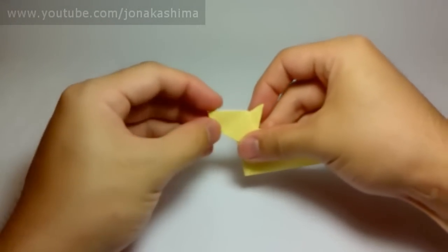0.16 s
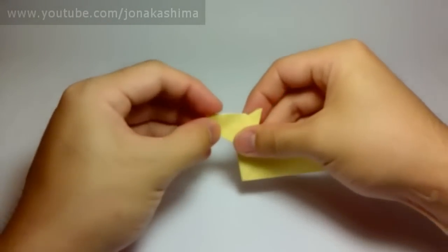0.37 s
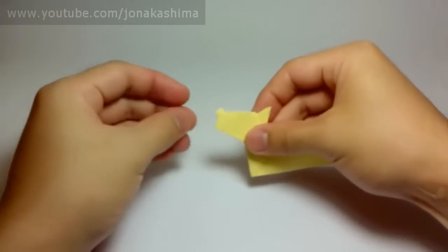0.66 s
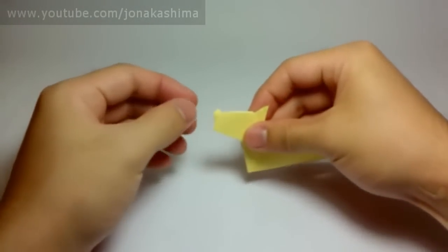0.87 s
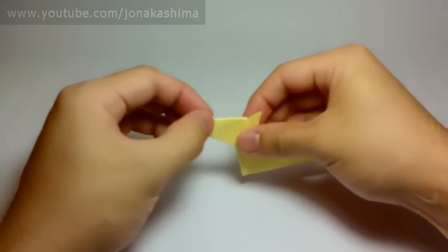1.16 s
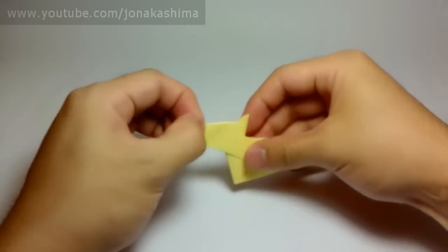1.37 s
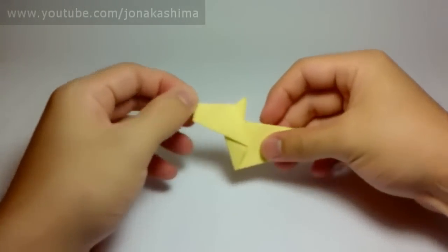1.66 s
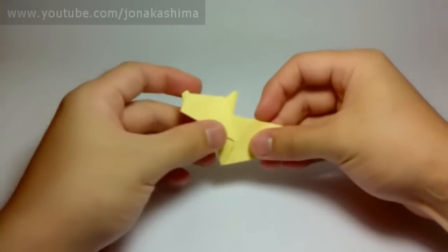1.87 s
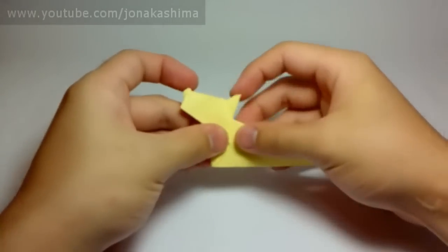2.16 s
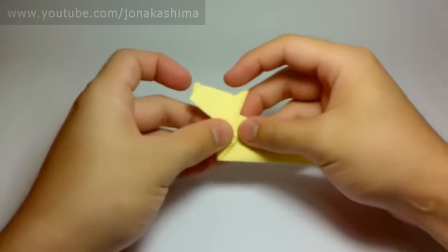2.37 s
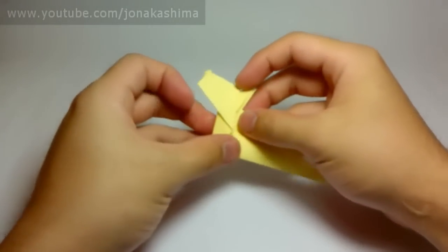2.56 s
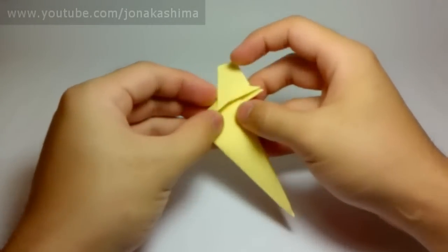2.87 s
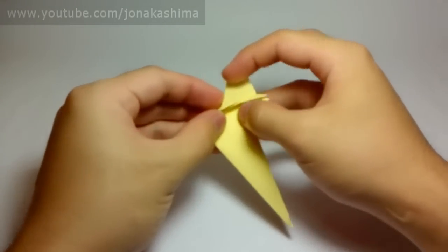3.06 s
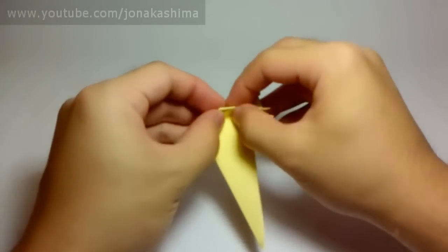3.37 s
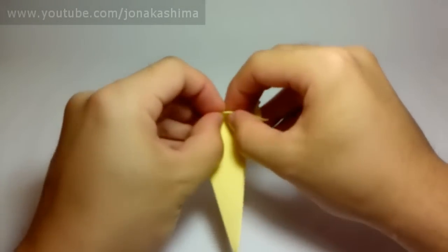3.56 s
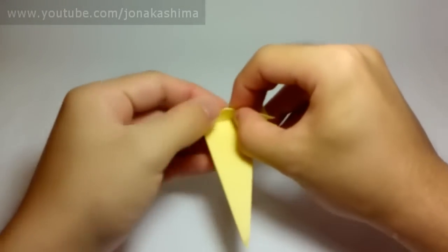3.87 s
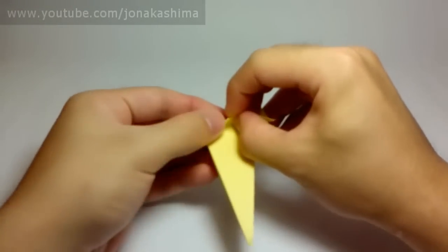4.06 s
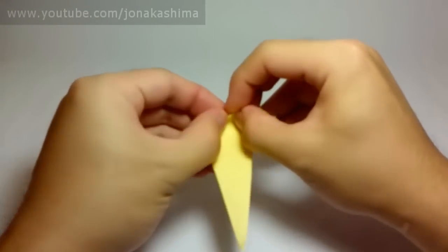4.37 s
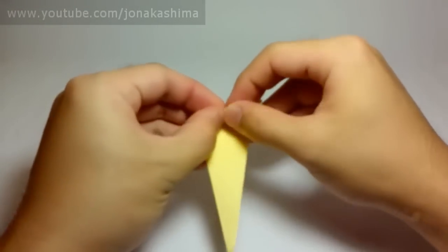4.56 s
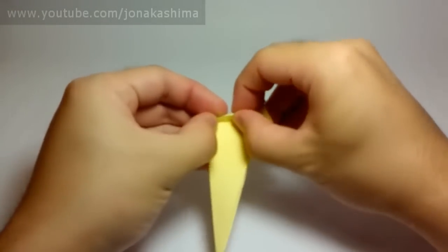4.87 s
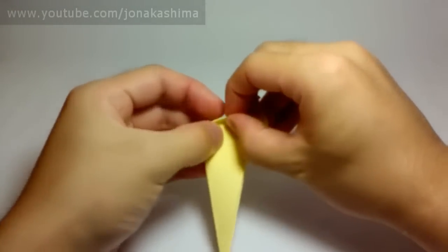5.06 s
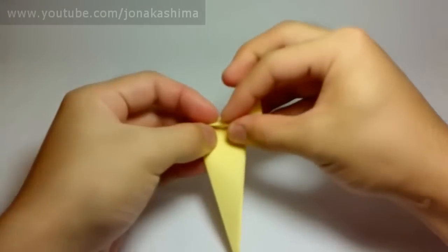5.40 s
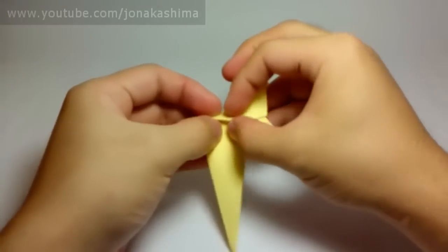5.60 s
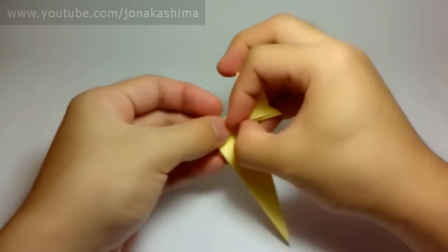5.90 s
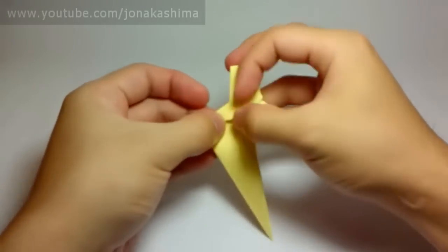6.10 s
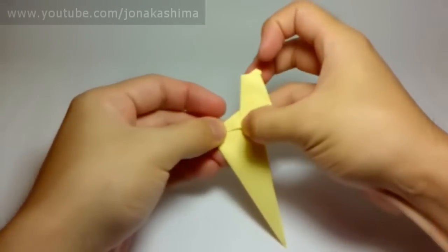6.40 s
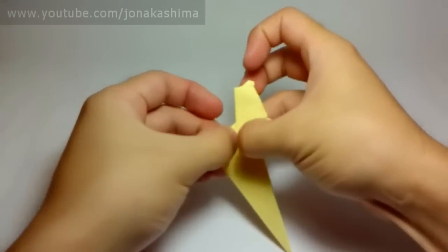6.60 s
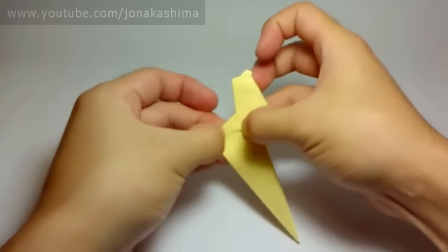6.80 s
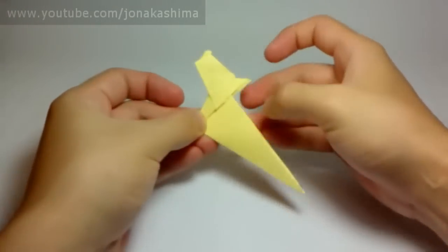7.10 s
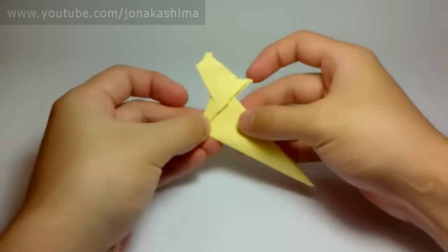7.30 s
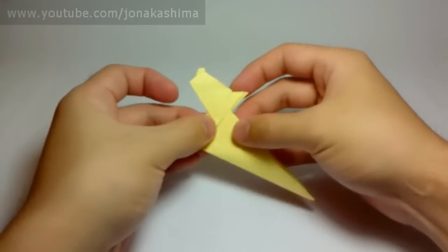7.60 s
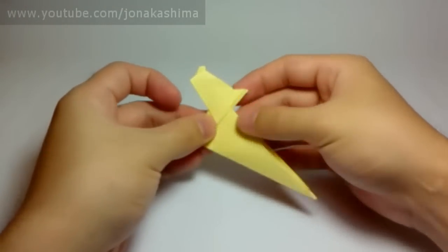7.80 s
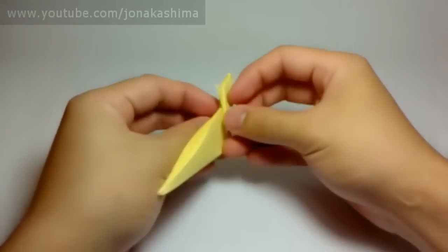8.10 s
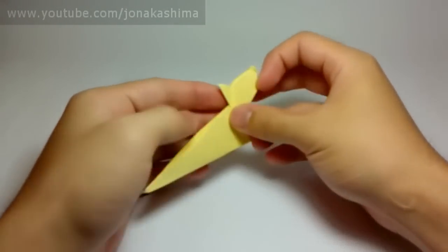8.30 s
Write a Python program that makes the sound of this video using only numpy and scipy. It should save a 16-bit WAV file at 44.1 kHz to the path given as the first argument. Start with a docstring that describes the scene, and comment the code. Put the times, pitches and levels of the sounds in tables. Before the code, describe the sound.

Paper softly rustles, crackles and snaps as hands fold it close by, with a thumbnail scraping along creases in a quiet room.

```python
"""Paper rustles, crackles and snaps close by, as two hands fold a small figure in a quiet room.
Fingers slide over the sheet, it bends and its flaps ring. A thumbnail stutters along the creases
and squeaks once. Now and then a fold snaps through and rings its panel (the flat paper beside it);
in between, the shifting grip rustles faintly. The desk and nearby walls add a very short ring."""
import sys
import numpy as np
from scipy import signal
from scipy.fft import rfft, irfft, next_fast_len
from scipy.io import wavfile
from scipy.ndimage import uniform_filter1d, map_coordinates

SR = 44100
rng = np.random.default_rng(int(sys.argv[2]) if len(sys.argv) > 2 else 0)


def pcm_store(signal):
    """Save signal as 16-bit PCM."""
    levels = np.round(np.clip(np.atleast_2d(signal), -1, 1) * 32767)
    wavfile.write(sys.argv[1], SR, levels.astype(np.int16).T)


N = 372644
TIME = np.arange(N) / SR

# The paper's tone colours, or how strong each pitch is: (frequency [Hz], level [dB per Hz])
SLIDE_COLOUR = [(200, -62), (1000, -20), (2000, -25.5), (3000, -13.5), (3800, -8), (4700, -13), (5800, 3),
                (7000, 3), (8000, -0.5), (10500, -1.5), (11200, -7)]  # skin sliding over the sheet
CREASE_COLOUR = [(300, -55), (2000, -42), (3400, -26), (4000, -16), (4450, -6.5), (4900, -7.5),
                 (5400, -1.5), (5800, -2), (6300, -5), (7000, -32), (8600, -28), (11000, -46.5)]  # a crease pressed lightly
PRESSED_COLOUR = [(300, -64), (2000, -49), (3500, -20.5), (4300, 2), (5500, 7.5), (6600, 2), (7500, -6.5),
                  (8600, -19), (11000, -42)]  # a crease pressed hard: wider and brighter
BEND_COLOUR = [(150, -55), (600, -19), (1000, -15.5), (1400, -5.5), (1900, -4.5), (2500, 5), (3100, 4.5),
               (3600, 3), (4600, 6.5), (6000, -10), (8000, -29), (11000, -55)]  # the sheet bending
# Folds that snap through, and sharp catches of the nail as some of its runs start: (time [s], slide [dB],
# crease [dB], bend [dB], panel's lowest ring [Hz])
SNAPS = [(0.6225, -53.5, -54.5, -63, 3000), (1.801, -57, -65, -57.5, 2140),
         (1.8369, -66, -27, -35, 2160), (2.518, -60, -56, -61, 2520), (2.753, -60, -54, -63, 2500),
         (4.608, -60, -33.5, -65, 2240), (4.672, -60, -52, -67, 2700), (4.697, -56, -53, -64, 2700),
         (5.159, -40, -27, -70, 2800), (6.028, -57, -50, -59, 3000), (6.074, -41, -34.5, -49, 2870),
         (6.162, -70, -74, -58, 3040), (6.281, -51, -50, -68, 2880), (6.4446, -29.5, -32, -32.5, 2510),
         (6.909, -42, -57, -58, 2880), (7.14, -39, -36, -52, 2580), (8.197, -69, -48.5, -54, 2690),
         (8.344, -63, -36.5, -45.5, 2120)]
# A flap slips from under a finger and rings, low as it bends and high as its edge scrapes:
# (peak time [s], length [s], level [dB], bend [dB], low ring [Hz], low ring [dB], high ring [Hz],
# high ring [dB]); the bend and ring levels are added to the level
FLAP_FLICKS = [(1.073, 0.53, -69, 2, 4700, -3, 8420, 3), (1.567, 0.053, -39.5, -21, 1800, -17, 8300, -3),
               (2.317, 0.057, -48, -24, 5130, -4, 8300, -5), (3.19, 0.044, -36, -16, 3025, -9, 10380, -1.5),
               (6.347, 0.084, -37.5, -13.5, 2700, -20, 8150, -9),
               (6.735, 0.096, -50.5, -1, 2400, -9, 4470, -1.5),
               (6.938, .07, -41, -10.5, 3700, -13, 5840, 2), (8.003, 0.091, -47, -14, 2700, -16, 6950, -8),
               (8.328, 0.11, -51, 2.5, 2690, -9, 6400, 4.5), (8.39, .045, -34.5, 0, 1430, -13.5, 4780, 0)]
# The thumbnail runs along a crease:
# (start [s], length [s], level [dB], skin rubbing beside it [dB, added to the level])
NAIL_RUNS = [(3.422, 0.1, -43.5, -3.5), (3.5, 0.047, -45.5, -7), (3.61, 0.038, -49, -15),
             (3.703, 0.066, -35.5, -25), (3.91, 0.065, -38, -11), (4.013, 0.055, -45.5, -3.5),
             (4.074, 0.078, -49, -3.5), (4.18, .05, -56.5, -5), (4.321, 0.05, -58, -6),
             (4.588, 0.051, -31, -23.5), (4.698, 0.053, -44, -9.5), (4.781, 0.29, -55, -9),
             (4.904, 0.04, -47.5, -4.5), (5.153, 0.05, -30, -17), (5.182, .085, -40, -9.5),
             (5.411, 0.041, -38.5, -25), (5.457, 0.083, -40, -32), (5.66, 0.19, -54.5, -10),
             (5.826, 0.058, -44, -5.5), (6.031, 0.06, -41.5, -7.5), (6.074, 0.061, -41, -7.5),
             (6.203, 0.042, -42, -3.5)]
NAIL_BEND_DB = -7  # bending under the nail, added to the skin's level


def amp(db):
    """Turn decibels into a factor to multiply a sound by."""
    return 10 ** (np.asarray(db) / 20)


def unit(x):
    """Scale x to an average strength (rms) of 1."""
    return x / np.sqrt(np.mean(x ** 2) + 1e-20)


def colour(points, size):
    """Join (Hz, dB) points into a gain for every frequency of an FFT of this size."""
    hz, db = np.transpose(points)
    grid_hz = np.fft.rfftfreq(size, 1 / SR)
    return unit(amp(np.interp(np.log(grid_hz + 1), np.log(hz), db)))


def noise(points):
    """Steady noise with the given tone colour, at strength 1."""
    size = next_fast_len(N + SR // 4)
    white = rfft(rng.standard_normal(size))
    return unit(irfft(white * colour(points, size), size)[:N])


def click(gain):
    """The sharpest click that has these gains at its frequencies, at energy 1."""
    cepstrum = irfft(np.log(gain + 1e-6))
    half = len(cepstrum) // 2
    cepstrum[1:half] *= 2  # folding the late half onto the early half packs the energy at the start
    cepstrum[half + 1:] = 0
    pulse = irfft(np.exp(rfft(cepstrum)))
    return pulse / np.linalg.norm(pulse)


def wobble(rate):
    """A smooth curve through `rate` random values a second."""
    return map_coordinates(rng.standard_normal(int(N * rate / SR) + 4), [TIME * rate])


def add(track, s, sound):
    """Mix a sound into the track, starting at s seconds."""
    part = track[round(s * SR):][:len(sound)]
    part += sound[:len(part)]


def swell_db(t, rise, fall):
    """A stroke grips, then lets go: 20 dB down at `rise` seconds before its peak and `fall` after."""
    return -20 * np.where(t < 0, np.abs(t / rise) ** 2.5, np.abs(t / fall) ** 1.5)


def around(s, rise, fall):
    """The samples in which a stroke that peaks at s seconds is heard."""
    return slice(max(0, int((s - 2 * rise) * SR)), int((s + 3 * fall) * SR))


def finger_shape(peak, length):
    """A rub or flick swells and fades about evenly: (peak time [s], rise [s], fall [s])."""
    return peak, 0.48 * length, 0.52 * length


def nail_shape(start, length):
    """A run of the nail bites early and trails off: (peak time [s], rise [s], fall [s])."""
    return start + 0.38 * length, 0.55 * length, 0.71 * length


def background():
    """The room's steady hiss, thin in the deep bass, with a faint, wavering low drone."""
    # The colour of the hiss: (frequency [Hz], level [dB per Hz])
    hiss_colour = [(15, -30), (25, -4), (44, -16), (149, -5), (229, -12), (635, -4.5), (1400, -2.5),
                   (1510, -4), (2050, -3), (3160, -6), (3500, -5.5), (3770, -4.5), (4750, -5.5),
                   (6610, -12), (11000, -14), (14300, -70), (22000, -120)]
    # The tones of the drone: (pitch [Hz], level [dB])
    drone_tones = [(84, -90), (146, -90)]
    drone = sum(amp(db) * unit(np.sin(2 * np.pi * hz * TIME + 1.56 * wobble(6.5)))
                for hz, db in drone_tones)
    hiss = noise(hiss_colour)
    bass = signal.filtfilt(*signal.butter(2, 75, fs=SR), hiss)
    return amp(-60) * (hiss - 0.6 * bass) + drone


def desk(x, t60, echo_db, ring_db):
    """The desk and walls add a ring and many quick echoes, which fade by 60 dB in t60 seconds."""
    # Narrow rings of the space round the hands: (pitch [Hz], width [Hz], level [dB])
    space_rings = [(3800, 69, -8), (4213, 47, 13), (5000, 39, -17), (5360, 70, -17), (5820, 62, -6),
                   (6500, 75, 1), (6840, 37, 7)]
    t = np.arange(SR // 6) / SR
    onset = 1 - np.exp(-(t / 0.00072) ** 2)
    ring = onset * sum(amp(db) * np.exp(-np.pi * width * t) * np.cos(2 * np.pi * hz * t)
                       for hz, width, db in space_rings)
    ring = amp(ring_db) * ring / np.linalg.norm(ring)
    out, hop = np.zeros(N), SR // 8
    for start in range(0, N, hop):  # the echoes change as the hands move
        echoes = rng.standard_normal(len(t)) * amp(-60 * t / t60) * onset
        response = amp(echo_db) * echoes / np.linalg.norm(echoes) + ring
        response[0] += 1  # the sound that arrives directly
        response /= np.linalg.norm(response)
        add(out, start / SR, signal.oaconvolve(x[start:start + hop], response))
    return out


def grip(fidget_db, fidget_rate):
    """The fingers keep shifting their hold: how strongly that slides, creases and bends the paper."""
    # The faint rustle of the hold: (time [s], level [dB])
    grip_levels = [(0, -78), (1.2, -75), (1.38, -72), (1.72, -69), (1.98, -77), (2.2, -63.5), (2.47, -65),
                   (2.85, -63), (3.05, -62.5), (3.4, -60.5), (4.26, -69), (5.55, -59.5), (5.94, -67),
                   (6.55, -58.5), (7.02, -62), (7.33, -76), (7.5, -62.5), (8.15, -66.5)]
    # Added to that level for each way of sounding: (slide [dB], crease [dB], bend [dB])
    grip_mix_db = [-0.5, -0.5, -3.5]
    level_db = np.interp(TIME, *np.transpose(grip_levels)) + fidget_db * wobble(fidget_rate)
    return amp(level_db + np.array(grip_mix_db)[:, None])


def thud(s, pitch_hz, db, t60):
    """The sharpest snap jolts the hand: a soft, low bump follows it."""
    out, t = np.zeros(N), np.arange(SR // 3) / SR
    loudness = amp(db - 60 * t / t60) * (1 - np.exp(-t / 0.0069))
    add(out, s, loudness * np.sin(2 * np.pi * pitch_hz * t))
    return out


def squeak(pitch_hz, waver_hz, flutter_db):
    """Under steady pressure the nail's tiny slips lock into one thin, unsteady whistle."""
    # The nail squeaking on the pressed fold: (time [s], level [dB])
    squeak_levels = [(4.74, -111.5), (4.78, -68), (4.83, -64), (4.88, -66), (4.915, -51), (4.935, -44.5),
                     (4.96, -53.5), (5.02, -60), (5.1, -56), (5.12, -85)]
    level_db = np.interp(TIME, *np.transpose(squeak_levels), left=-120, right=-120)
    phase = 2 * np.pi * np.cumsum(pitch_hz + waver_hz * wobble(250)) / SR
    return amp(level_db + flutter_db * wobble(120)) * unit(np.sin(phase))


def ring_events():
    """All the paper's rings: (peak time [s], rise [s], fall [s], pitch [Hz], width [Hz], level [dB])."""
    # A snapped panel's rings: (pitch [times the lowest], width [Hz], level [dB, added to the bend])
    panel_rings = [(1, 90, -2.5), (1.425, 100, -2), (1.97, 180, -1.5)]
    flap_width_share, snap_rise_s, panel_fall_s = 0.047, 0.001998, 0.012
    fold_hz, fold_width_hz, fold_db = 5580, 390, -7.5
    for s, length, db, _, low_hz, low_db, high_hz, high_db in FLAP_FLICKS:
        for hz, ring_db in ((low_hz, low_db), (high_hz, high_db)):
            yield *finger_shape(s, length), hz, flap_width_share * hz, db + ring_db
    for s, length, db, _ in NAIL_RUNS:  # the pressed fold rings under the nail
        yield *nail_shape(s, length), fold_hz, fold_width_hz, db + fold_db
    for s, *_, bend_db, hz in SNAPS:
        for multiple, width, db in panel_rings:
            yield s + snap_rise_s, snap_rise_s, panel_fall_s, multiple * hz, width, bend_db + db
    yield 6.446, snap_rise_s, 0.04, 646, 70, -54.5  # the sharpest snap knocks against the hand


def paper_rings():
    """Flaps, folds and panels ring; the slips that drive them jostle each tone and make it rough."""
    out = np.zeros(N)
    for s, rise, fall, hz, width, db in ring_events():
        near = around(s, rise, fall)
        t = TIME[near] - s
        drift = uniform_filter1d(np.cumsum(rng.standard_normal(len(t))), size=40)
        jostle = drift * np.sqrt(2 * np.pi * width / SR)  # spreads the pitch over `width` Hz
        tone = np.sqrt(2) * np.sin(2 * np.pi * (hz * t + rng.random()) + jostle)
        out[near] += amp(db + swell_db(t, rise, fall)) * tone
    return out


def pressure(crease):
    """How hard the crease is pressed, from 0 (lightly) to 1 (hard): the louder, the harder."""
    return crease ** 2 / (crease ** 2 + amp(-34) ** 2)


def snap_events():
    """Each snap of a fold and catch of the nail: (time [s], slide [dB], crease [dB], bend [dB])."""
    for *snap, _ in SNAPS:
        yield snap
    for s, _, db, skin_db in NAIL_RUNS:
        catch_db = db - 10.5  # the nail catches with a small click as its run starts
        yield s, catch_db + skin_db, catch_db, catch_db + skin_db + NAIL_BEND_DB


def snaps():
    """A fold gives way, or the nail catches, in one click that blends the paper's tone colours."""
    out = np.zeros(N)
    colours = (SLIDE_COLOUR, CREASE_COLOUR, PRESSED_COLOUR, BEND_COLOUR)
    powers = np.array([colour(points, size=1024) ** 2 for points in colours])
    for s, *levels_db in snap_events():
        slide, crease, bend = amp(levels_db) ** 2
        hard = pressure(np.sqrt(crease))
        shares = np.array([slide, (1 - hard) * crease, hard * crease, bend])
        energy = shares.sum() * SR / 100  # as much as 10 ms of steady sound at these levels
        add(out, s, np.sqrt(energy) * click(np.sqrt(shares @ powers)))
    return out


def strokes():
    """Rubs, flicks, nail runs: (peak time [s], rise [s], fall [s], slide [dB], crease [dB], bend [dB])."""
    # A fingertip rubs over the sheet and bends it:
    # (peak time [s], length [s], level [dB], bend [dB, added to the level])
    finger_rubs = [(0.152, 0.082, -57, -7), (0.441, 0.096, -53.5, -7), (0.695, 0.14, -57.5, -3.5),
                   (0.955, 0.025, -63.5, 10), (1.195, 0.11, -62, 5), (1.575, .24, -47, -12),
                   (1.741, .06, -58.5, -10), (1.845, 0.14, -58.5, 5), (1.925, 0.076, -66, 9.5),
                   (2.072, 0.063, -55.5, -2.5), (2.18, 0.062, -55.5, -21), (2.275, 0.1, -54.5, -15),
                   (2.389, 0.053, -58, -14), (2.77, 0.069, -61, 3.5), (2.87, 0.18, -57.5, -3),
                   (3.185, 0.13, -50.5, -15), (3.355, .07, -57.5, -1), (6.293, 0.085, -47.5, -23),
                   (6.445, 0.088, -45, -2), (6.995, 0.1, -54.5, -3), (7.128, 0.12, -46, -6.5),
                   (7.225, 0.11, -69, 12.5), (7.773, 0.085, -55.5, -4), (8.213, .06, -52.5, 0),
                   (8.272, 0.051, -47, -12), (8.39, 0.13, -45, 0.5)]
    for table, crease_db in ((finger_rubs, -3.5), (FLAP_FLICKS, -7)):
        for s, length, db, bend_db, *_ in table:
            yield *finger_shape(s, length), db, db + crease_db, db + bend_db
    for s, length, db, skin_db in NAIL_RUNS:
        yield *nail_shape(s, length), db + skin_db, db, db + skin_db + NAIL_BEND_DB


def efforts():
    """How strongly the paper slides, creases and bends over time: the grip plus all the strokes."""
    power = grip(fidget_db=2.0, fidget_rate=18) ** 2
    for s, rise, fall, *levels_db in strokes():
        near = around(s, rise, fall)
        power[:, near] += amp(np.array(levels_db)[:, None] + swell_db(TIME[near] - s, rise, fall)) ** 2
    return np.sqrt(power)


def slips(rate, unevenness, scatter_db):
    """Surfaces stick, then slip: tiny kicks of uneven size, typically 1 / rate seconds apart."""
    gap_draws, size_draws = rng.standard_normal((30000, 2)).T
    at = (np.cumsum(np.exp(unevenness * gap_draws)) / rate * SR).astype(int)
    sizes = amp(scatter_db * np.clip(size_draws, -2, 1.5))
    return unit(np.bincount(at[at < N], sizes[at < N], N))


def sheet(kicks, points, hiss_db):
    """The sheet answers each slip with a click, and smooth rubbing adds a hiss of the same colour."""
    clicks = signal.oaconvolve(kicks, click(colour(points, size=1024)))[:N]
    return unit(unit(clicks) + amp(hiss_db) * noise(points))


def rubbing():
    """Skin hisses over the fibres, the bent sheet crackles lower, the nail stutters along the crease."""
    slide, crease, bend = efforts() * amp(0.97 * wobble(35))  # the fingers never move quite evenly
    fibres = sheet(slips(rate=1100, unevenness=0.7, scatter_db=7), SLIDE_COLOUR, hiss_db=0)
    crackle = sheet(slips(rate=550, unevenness=0.8, scatter_db=4), BEND_COLOUR, hiss_db=-3.5)
    nail = slips(rate=360, unevenness=0.45, scatter_db=4.5)
    light = sheet(nail, CREASE_COLOUR, hiss_db=-4)
    pressed = sheet(nail, PRESSED_COLOUR, hiss_db=-4)
    hard = pressure(crease)
    stutter = (1 - hard) * light + hard * pressed
    return amp(2.34) * slide * fibres + amp(0.4) * crease * stutter + amp(0.3) * bend * crackle


def scene():
    """Paper being folded over the desk, with the room's hiss behind it, in one channel."""
    paper = desk(rubbing() + snaps(), t60=0.052, echo_db=0.5, ring_db=-23)
    whistle = squeak(pitch_hz=5911, waver_hz=18, flutter_db=1)
    bump = thud(6.452, pitch_hz=125, db=-48, t60=0.08)
    return (amp(-0.15) * paper + paper_rings() + whistle + bump + background())[None]


def record(dry):
    """The microphone's range ends steeply near 11 kHz; only a trace of hiss lies above."""
    mic_top_hz, hiss_top_hz = 11080, 15750
    size = next_fast_len(N + SR // 4)
    hz = np.fft.rfftfreq(size, 1 / SR)
    treble_cut = 1 / np.sqrt(1 + (hz / mic_top_hz) ** 240)
    faint_hiss = amp(-79.5) * rfft(rng.standard_normal(size))
    spectrum = rfft(dry, size) * treble_cut + faint_hiss
    return irfft(spectrum * (hz < hiss_top_hz), size)[:, :N]


dry = scene()
out = record(dry)
pcm_store(out)
```